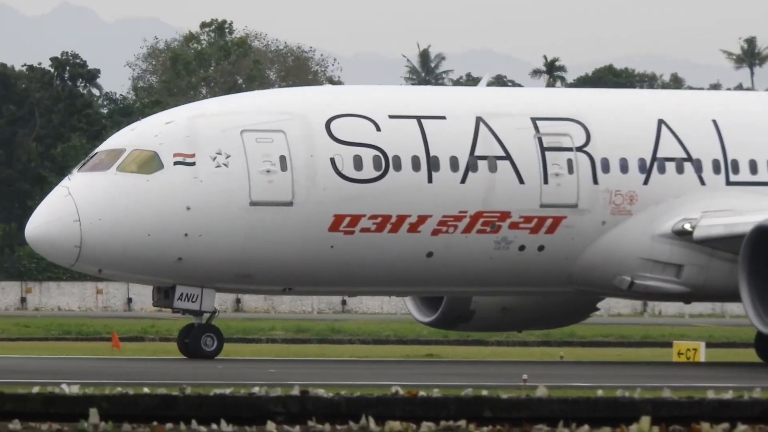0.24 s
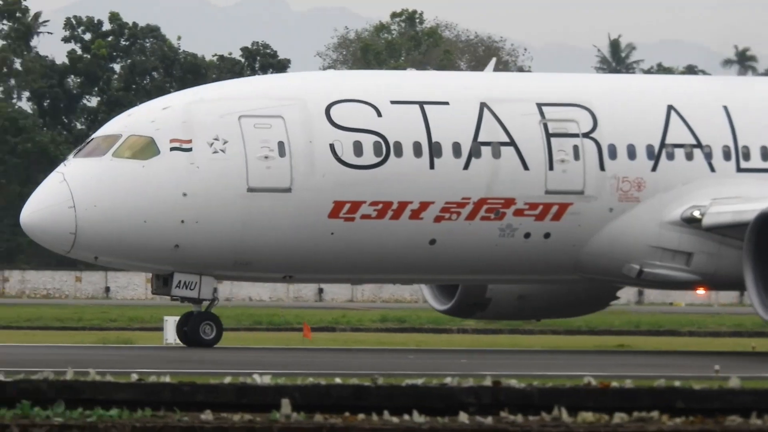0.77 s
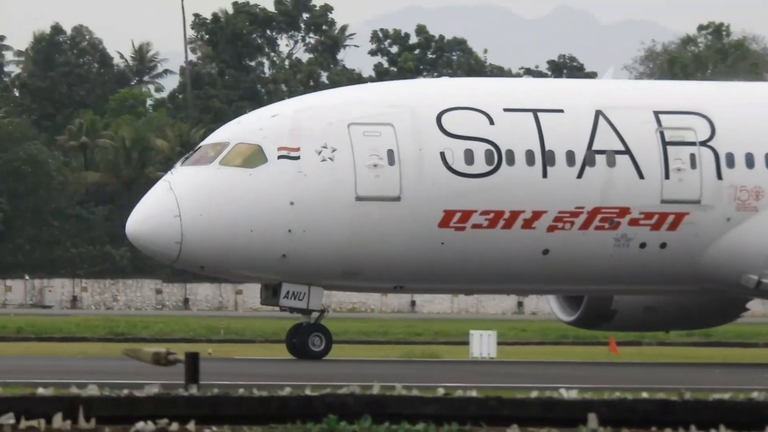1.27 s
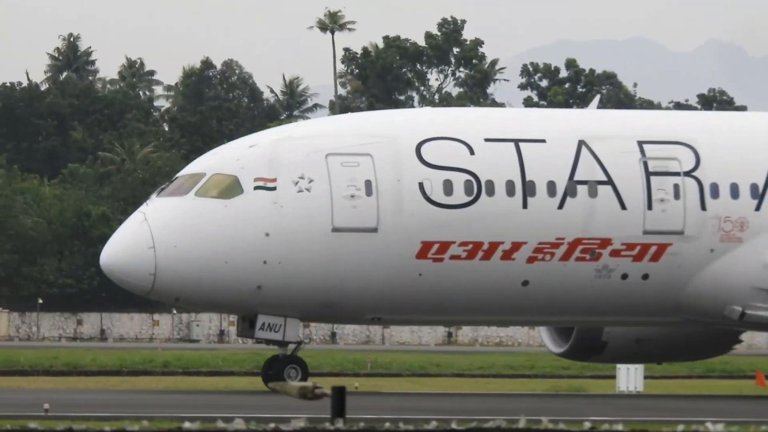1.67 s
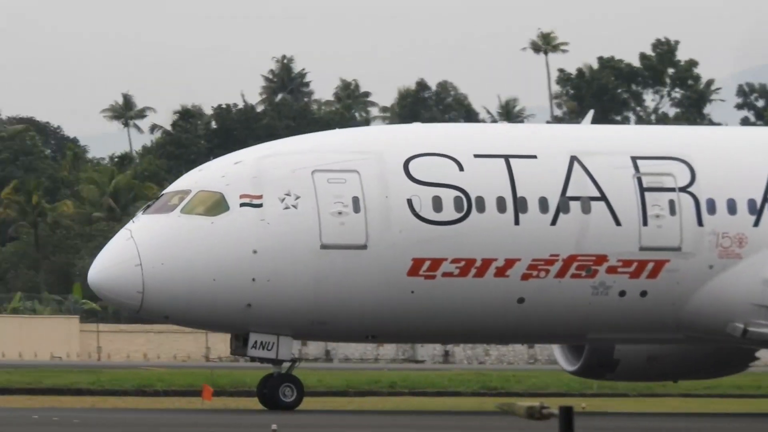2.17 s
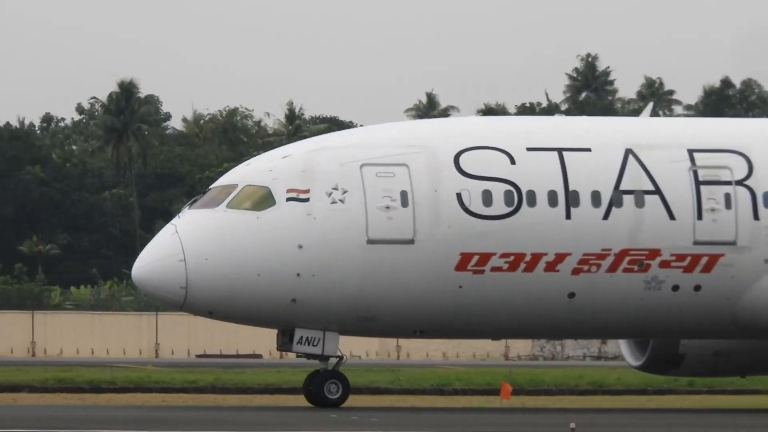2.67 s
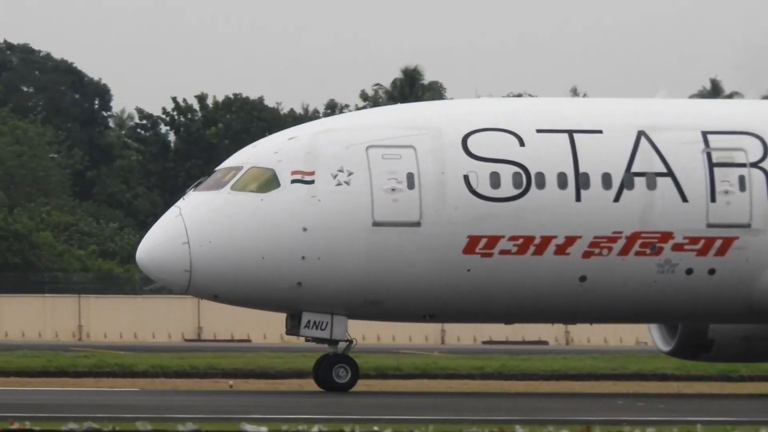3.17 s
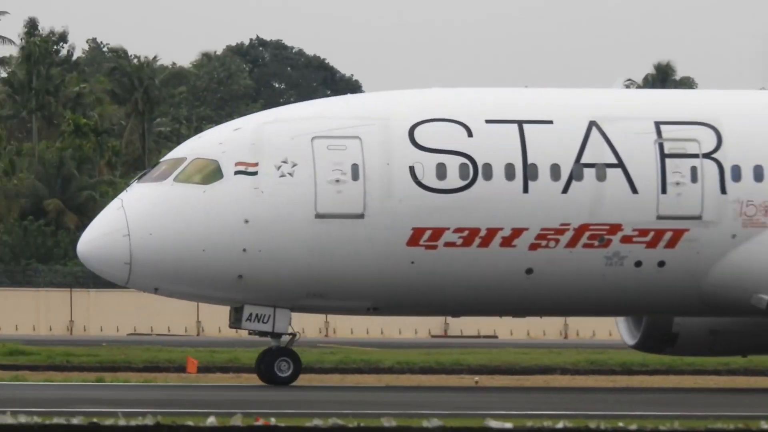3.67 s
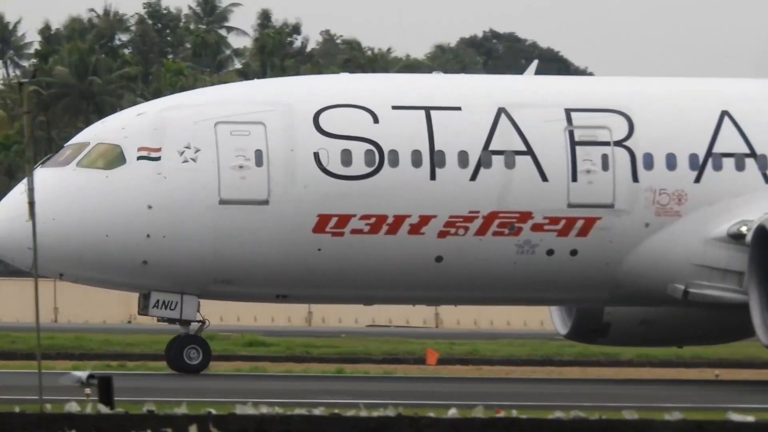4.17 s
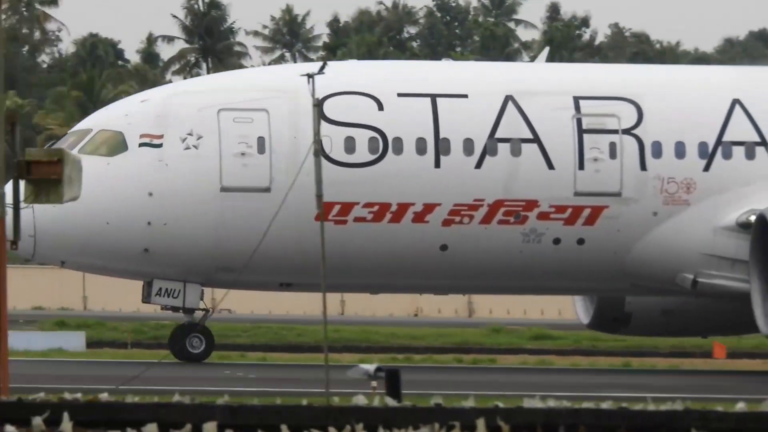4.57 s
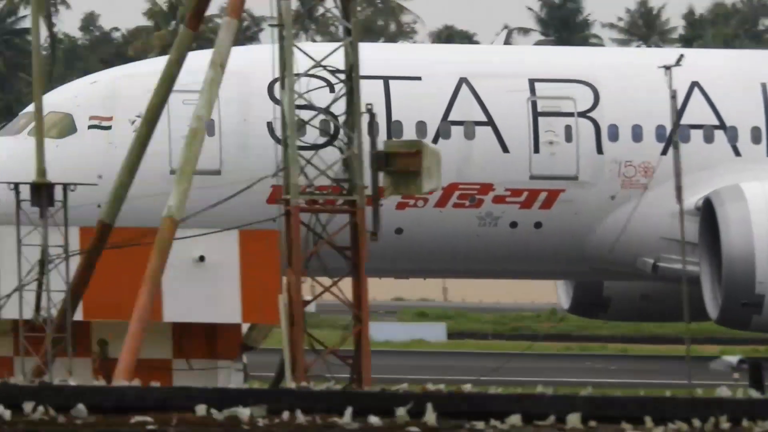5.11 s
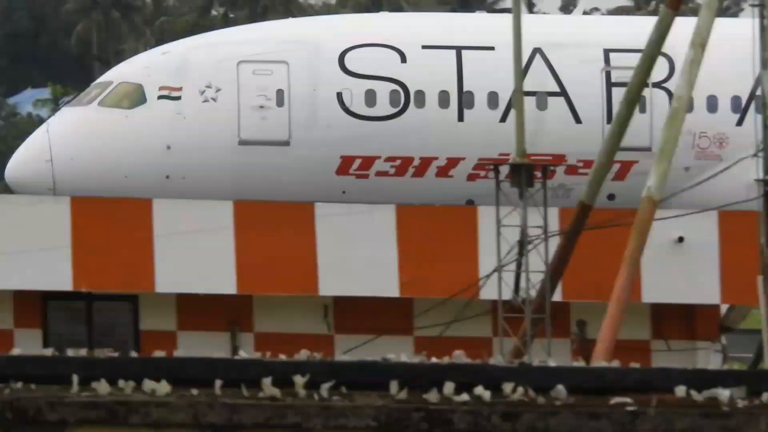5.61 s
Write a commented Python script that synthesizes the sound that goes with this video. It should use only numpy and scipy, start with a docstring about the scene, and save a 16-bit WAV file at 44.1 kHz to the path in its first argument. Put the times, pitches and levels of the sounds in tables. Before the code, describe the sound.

Low jet rumble and bright gusty hiss from a passing airliner; thin falling whistles early, then a rising fan whine and hollow howl.

```python
"""Distant airliner taxiing and spooling up

A twin-engine airliner taxis past at a distance, heard outdoors on a camera's two microphones.
Filtered noise makes the exhaust rumble, the rushing air and the intake hiss; thin whistles slide down.
Sine overtones of the blade rate climb as the two fans spool up, and swell as their beam sweeps past.
Gusts lift the treble and random motion makes it flutter; the left channel is dull and slightly late."""
import sys
import numpy as np
from scipy import signal
from scipy.fft import rfft, irfft, next_fast_len
from scipy.io import wavfile
from scipy.ndimage import map_coordinates

SR = 44100
rng = np.random.default_rng(int(sys.argv[2]) if len(sys.argv) > 2 else 0)


def materialize(psi):
    """Save the field psi as 16-bit PCM at rate SR to the path in sys.argv[1].

    A 1-D psi becomes a single channel; in a 2-D psi each row is a channel.
    """
    bounded = np.clip(np.atleast_2d(psi).T, -1, 1)
    quanta = np.round(bounded * 32767).astype(np.int16)
    wavfile.write(sys.argv[1], SR, quanta)


N = 257984
TIME = np.arange(N) / SR  # s

# Fan speed as the rate of passing blades: [t/s, f/Hz]
FAN_SPEED = [(0, 410), (1, 465), (1.5, 518), (1.75, 547), (2, 567), (2.25, 584), (2.5, 597), (3, 617),
             (3.5, 635), (4, 645), (5, 654), (5.85, 657)]


def amp(db):
    """Decibels to gain."""
    return 10 ** (np.asarray(db) / 20)


def curves(table):
    """Each column of a table after the first, drawn as a line through time."""
    s, *columns = np.transpose(table)
    return [np.interp(TIME, s, column) for column in columns]


def bell(s, spread_s):
    """A smooth Gaussian rise and fall that peaks at 1."""
    return np.exp(-0.5 * ((TIME - s) / spread_s) ** 2)


def shape(x, colour, lag=None):
    """Filter by points of [f/Hz, level/dB], with an optional delay by points of [f/Hz, delay/s]."""
    size = next_fast_len(N, True)
    f = np.arange(size // 2 + 1) * SR / size
    hz, db = np.transpose(colour)
    gain = amp(np.interp(np.log(f + 1), np.log(hz), db))
    if lag is not None:
        delay_s = np.interp(f, *np.transpose(lag))
        gain = gain * np.exp(-2j * np.pi * f * delay_s)
    return irfft(rfft(x, size) * gain, size)[:N]


def noise(colour):
    """Two unrelated noises of one colour, together of rms 1: the direct and the scattered sound."""
    x = np.array([shape(rng.standard_normal(N), colour) for _ in range(2)])
    return x / x.std()


def walk(rate):
    """Smooth random motion with a spread near 1, through `rate` random points per second."""
    points = rng.standard_normal(4096)
    coarse_s = TIME[::32]
    motion = map_coordinates(points, [coarse_s * rate], order=3, mode="wrap")
    return np.interp(TIME, coarse_s, motion)


def tone(phase, haze, haze_rate):
    """Direct and scattered tone of rms near 1; turbulence spreads a part into a narrow skirt of noise."""
    in_phase = (1 + haze * walk(haze_rate)) * np.sin(phase)
    quadrature = haze * walk(haze_rate) * np.cos(phase)
    direct = (in_phase + quadrature) / np.sqrt(1 + 2 * haze ** 2)
    scattered = np.sin(phase + 2 * walk(18))
    return np.sqrt(2) * np.array([direct, scattered])


def exhaust(boom_db=4, boom_fade_db_per_s=0.5):
    """Jets of hot gas rumble, boom and roar as shaped noise; a wavering drone swells among them."""
    # Exhaust before trim: [t/s, deep rumble level/dB, jet roar level/dB]
    exhaust_levels = [(0, -31.5, -34.5), (.4, -38, -34.5), (.75, -34.5, -33), (.95, -35, -34.5),
                      (1.22, -27.5, -32.5), (1.6, -27, -30), (2.0, -28.5, -36.5), (2.9, -33.5, -36),
                      (3.4, -31, -38.5), (3.95, -30.5, -33.5), (4.55, -30, -30), (5.45, -26, -30),
                      (5.85, -31.5, -30.5)]
    # Drone that swells as the engines spool up, before trim: [t/s, f/Hz, level/dB]
    drone_course = [(0, 100.5, -43), (.68, 102.2, -27), (.92, 101.9, -41), (1.05, 97.7, -18),
                    (1.5, 96.48, -24.5), (1.85, 91.5, -22), (2.1, 89, -29), (2.6, 95.24, -30),
                    (3.1, 93.3, -32), (3.6, 95.8, -46)]
    # Relative spectra of the three noises: [f/Hz, level/dB]
    rumble_colour = [(12, -13), (22, -25), (37, -41), (52, -14), (64, 5.5), (78, 7), (95, -3), (130, -12),
                     (300, -58)]
    boom_colour = [(60, -39), (78, -8), (88, -3), (97, 0), (110, -5), (128, -1.5), (160, -11.5), (200, -18),
                   (300, -52)]
    roar_colour = [(100, -1), (150, 3.5), (195, 1.5), (230, -5.5), (280, -11.5), (380, -13.5), (500, -14),
                   (800, -37)]

    rumble_db, roar_db = curves(exhaust_levels)
    drone_hz, drone_db = curves(drone_course)
    rumble = noise(rumble_colour) * amp(rumble_db - 1.0)
    # the boom follows rumble and roar, and slowly recedes against them
    boom_level_db = (rumble_db + roar_db) / 2 + boom_db - boom_fade_db_per_s * TIME
    boom = noise(boom_colour) * amp(boom_level_db)
    roar = noise(roar_colour) * amp(roar_db + 1.5)
    drone_phase = 2 * np.pi * np.cumsum(drone_hz) / SR
    drone = tone(drone_phase, haze=0.66, haze_rate=20) * amp(drone_db - 2.6)
    return rumble + boom + roar + drone


def airflow(howl_s=5.15, howl_spread_s=0.56, howl_rise_db=8):
    """Air rushes through the engines as banded noise; a hollow howl swells as they draw level."""
    # Rushing air before trim: [t/s, rush level/dB, upper rush level/dB]
    rush_levels = [(0, -47, -43), (.3, -46.5, -44), (.55, -42.5, -39), (.82, -39.5, -37.5),
                   (1.02, -42, -39.5), (1.35, -41.5, -34), (1.78, -42, -36), (1.95, -47, -42),
                   (2.8, -47.5, -40), (3.8, -48.5, -43.5), (4.3, -46, -40.5), (5.1, -40.5, -37.5),
                   (5.85, -45, -40.5)]
    # Relative spectra, the howl's around the blade rate: [f/Hz, level/dB]
    howl_colour = [(380, -31), (500, -5.5), (570, -1), (650, 1), (730, -0.5), (820, -15.5), (1100, -33)]
    rush_colour = [(200, -30), (350, -9), (480, -12.5), (850, 1.5), (1100, 5), (1400, -2.5), (1700, 4),
                   (1950, 1.5), (2400, 7.5), (3500, -27)]
    upper_rush_colour = [(1600, -20), (2000, 1), (2400, 3.5), (2800, 3.5), (3250, -1.5), (3700, -20),
                         (4500, -64.5)]

    rush_db, upper_db = curves(rush_levels)
    howl_db = -40.5 + howl_rise_db * bell(howl_s, howl_spread_s)
    howl = noise(howl_colour) * amp(howl_db + 0.66 * walk(22))
    rush = noise(rush_colour) * amp(rush_db + 8.5 + 1.4 * walk(14))
    upper = noise(upper_rush_colour) * amp(upper_db + 6 + 1.5 * walk(21.99))
    return howl + rush + upper


def gusts():
    """Moving air carries the treble over: the lift in dB of its lower and its upper part."""
    # Gusts: [t/s of the peak, spread/s, lower hiss lift/dB, upper hiss lift/dB]
    gust_events = [(2.34, 0.05, 4.5, 3.5), (2.758, 0.039, 6, 2), (2.92, 0.094, 1.5, 4.5),
                   (3.054, .03, 2.5, 4.5), (3.15, 0.017, 3.5, 7), (3.415, 0.048, 1.5, 4),
                   (3.603, 0.028, 2, 8), (4.225, 0.026, .5, 5.5), (4.63, 0.035, 0, 3.5),
                   (4.798, 0.039, 1, 5), (5.662, 0.054, 4.5, 6)]
    return sum(np.outer([low_db, high_db], bell(s, spread_s))
               for s, spread_s, low_db, high_db in gust_events)


def ribbed(x, centre_hz=3874, spacing_hz=104, spread_hz=220, depth_db=2.6):
    """Evenly spaced peaks and dips rib the lower edge of the hiss."""
    offset = np.arange(-800, 800, 8)  # Hz
    ripple = np.cos(2 * np.pi * offset / spacing_hz)
    db = depth_db * ripple * np.exp(-0.5 * (offset / spread_hz) ** 2)
    return shape(x, np.column_stack([centre_hz + offset, db]))


def intakes(brighten_db_per_hz=0.0115):
    """Two broad humps of hiss, the upper rising with fan speed; gusts lift them and eddies flutter them."""
    # Intake hiss between gusts, before trim: [t/s, level/dB]
    hiss_levels = [(0, -29), (.35, -27.5), (.45, -24), (.7, -22.5), (.95, -25), (1.25, -21.5),
                   (1.83, -20.5), (2.04, -26.5), (2.95, -27), (3.3, -29.5), (3.9, -33), (4.3, -28.5),
                   (5.3, -26), (5.85, -30)]
    # Relative spectra of the two humps: [f/Hz, level/dB]
    low_hiss_colour = [(2700, -28.5), (3300, -13.5), (3750, -8.5), (4300, 0.5), (4750, 2), (5350, 0.5),
                       (6000, -4.5), (7000, -61), (8500, -62)]
    high_hiss_colour = [(5200, -33), (6200, -7.5), (6700, -4), (7300, 2), (7900, 2), (8500, -5),
                        (9200, -12), (9800, -23), (10250, -24), (10450, -28), (11200, -44)]

    hiss_db, = curves(hiss_levels)
    blade_hz, = curves(FAN_SPEED)
    low_gust_db, high_gust_db = gusts()
    bright_db = brighten_db_per_hz * (blade_hz - blade_hz[0])
    low_db = hiss_db + low_gust_db + 4.5 + 0.77 * walk(35)
    high_db = hiss_db + high_gust_db + bright_db + 5.0 + 0.9 * walk(40)
    low = noise(low_hiss_colour) * amp(low_db)
    high = noise(high_hiss_colour) * amp(high_db)
    return np.array([ribbed(x) for x in low]) + high


def whistles(centre_hz=9740, fall_hz_per_s=1050, half_length_s=0.1):
    """Thin tones slide down through a narrow band of sizzle and die out as the fans speed up."""
    # Whistles: [t/s of the loudest point, level/dB]
    whistle_events = [(-.06, -18.5), (0.202, -23.5), (.5, -22.5), (.74, -23), (.96, -25), (1.15, -26.5),
                      (1.321, -29.5), (1.499, -30)]
    # Sizzle around them: [t/s, level/dB]
    sizzle_levels = [(0, -29.5), (.6, -26.5), (1.2, -29), (1.6, -30.5), (2.1, -36), (2.6, -45)]
    # Relative spectrum of the sizzle: [f/Hz, level/dB]
    sizzle_colour = [(8700, -17), (9300, -1), (9550, 4.5), (9800, 2.5), (10050, -1.5), (10300, -12),
                     (10800, -39)]

    sizzle_db, = curves(sizzle_levels)
    out = noise(sizzle_colour) * amp(sizzle_db)
    for s, db in whistle_events:
        age = TIME - s
        phase = 2 * np.pi * np.cumsum(centre_hz - fall_hz_per_s * age) / SR
        # half amplitude at half_length_s either side of the peak
        swell = 1 / (1 + (age / half_length_s) ** 2) * (np.abs(age) < 0.5)
        out = out + tone(phase, haze=0.96, haze_rate=50) * amp(db) * swell
    return out


def breeze():
    """A light breeze buffets the microphones: soft low noise, different at each port."""
    # Relative spectrum of the buffeting: [f/Hz, level/dB]
    breeze_colour = [(15, -14), (28, -2), (40, 5), (55, -4), (120, -38.5)]
    # Buffeting: [t/s, level/dB]
    breeze_levels = [(0, -35), (1.85, -43), (2.2, -52), (5.85, -49)]
    breeze_db, = curves(breeze_levels)
    return noise(breeze_colour) * amp(breeze_db)


def fan_note(phase):
    """The lowest tones of the two fans merge into one that fades in and out over a faint steady part."""
    # Swells before trim: [t/s of the peak, half-length/s, level/dB]
    swell_events = [(1.66, 0.14, -41.5), (2.268, 0.14, -32.5), (2.625, .04, -33), (2.794, 0.024, -35.5),
                    (2.99, 0.044, -35), (3.326, 0.24, -33.5), (3.65, 0.028, -36.5), (4.467, 0.18, -35.5),
                    (5.05, 0.25, -36.5), (5.695, .05, -40)]
    swell = sum(amp(db) / (1 + ((TIME - s) / half_length_s) ** 8)
                for s, half_length_s, db in swell_events)
    steady = amp(-46) * np.interp(TIME, [1.4, 2.5], [0, 1])
    return tone(phase, haze=0.26, haze_rate=35) * np.hypot(swell, steady) * amp(0.5)


def fans(fade_db=2.5, near_db=-2.0, far_db=-3.0, gust_share=1.0):
    """Two fans at slightly different speeds; overtones of the blade rate beam forward and sideways."""
    # Overtones before trim: [multiple of blade rate, forward beam level/dB, side level/dB]
    overtones = [(2, -36.5, -60), (3, -39.5, -61), (4, -39, -49), (5, -39.5, -62), (6, -44, -40),
                 (7, -47, -32), (8, -39, -32.5), (9, -29, -48), (10, -44, -36), (11, -36, -30.5),
                 (12, -31.5, -33.5), (13, -25.5, -45), (14, -34, -56)]
    # Brief glints of single overtones before gusts: [multiple of blade rate, t/s of the peak, level/dB]
    glints = [(8, 1.795, -20), (9, 1.8, -24), (7, 1.98, -35), (13, 2.273, -28), (9, 2.327, -29),
              (8, 2.77, -34), (9, 2.733, -31.5), (11, 3.08, -27), (12, 3.14, -20), (12, 3.3, -26)]
    # Start and end of the side of the fans coming into view: [t/s]
    side_view_s = [1.5, 4.2]
    beam_narrowing = 0.33  # higher overtones beam more narrowly, by this power of their multiple

    blade_hz, = curves(FAN_SPEED)
    near_hz = blade_hz * (1 + 0.000674 * walk(15))
    far_hz = blade_hz * (1 - 0.009 + 0.001111 * walk(14))
    near = 2 * np.pi * np.cumsum(near_hz) / SR
    far = 2 * np.pi * np.cumsum(far_hz) / SR
    out = fan_note((near + far) / 2)
    beam = bell(2.5, spread_s=0.34)  # sweep of the forward beam for the 8th overtone
    side = np.interp(TIME, side_view_s, [0, 1])
    gust_db = gust_share * gusts().mean(axis=0)
    for multiple, beam_db, side_db in overtones:
        k = round(multiple)
        height = k / 8
        # the low overtones come mostly from the far fan, around the fuselage, broken into a band of noise
        clean = tone(k * near, haze=0.7, haze_rate=45) * amp(near_db) * min(height, 1)
        hoarse = tone(k * far, haze=4, haze_rate=130) * amp(far_db)
        # each overtone fades on its own, the low ones most deeply; gusts lift the high ones most
        fading_db = fade_db * walk(18) / np.sqrt(height)
        flutter = amp(fading_db + gust_db * height - 0.6)
        forward = amp(beam_db) * beam ** (height ** (2 * beam_narrowing))
        sideways = amp(side_db) * side
        out = out + (clean + hoarse) * flutter * (forward + sideways)
    for multiple, s, db in glints:
        glint = tone(round(multiple) * near, haze=0.87, haze_rate=60)
        out = out + glint * amp(db + gust_db) * bell(s, spread_s=0.095)
    return out


def scene():
    """The right channel hears the aircraft fully; the left is shaded, later and mixed with scattered sound."""
    # Sound scattered from the surroundings against the direct sound: [f/Hz, level/dB]
    scatter = [(25, 12), (60, -31), (120, -16.5), (350, 4), (620, -12), (900, 3), (1400, -5), (2000, -7.5),
               (2500, 3), (3100, 2.5), (4500, 2), (6000, -4), (8000, 5), (9700, -2)]
    # Left channel against the right: [f/Hz, level/dB]
    left_shade = [(100, 2), (350, 2.5), (650, 1.5), (1300, 1), (1950, 0), (2500, -11), (3300, -8),
                  (4200, -14.5), (5500, -20.5), (6400, -19.5), (7600, -42.5), (8800, -32), (9700, -29)]
    # Delay of the left channel, where sound bends round the camera body: [f/Hz, delay/s]
    left_lag = [(600, 0.00021), (1500, 0.00016), (2000, 0.00021), (3100, 0.00012), (3800, 0.00016),
                (7000, 0.00019)]

    direct, scattered = exhaust() + airflow() + intakes() + whistles() + fans()
    # the two shares add up to the full power at each frequency
    direct_share = [(hz, -10 * np.log10(1 + amp(db) ** 2)) for hz, db in scatter]
    scattered_share = [(hz, -10 * np.log10(1 + amp(-db) ** 2)) for hz, db in scatter]
    mixed = shape(direct, direct_share) + shape(scattered, scattered_share)
    left = shape(mixed, left_shade, lag=left_lag)
    return np.array([left, direct]) + breeze()


def record(dry, ceiling=0.92, top_hz=11100):
    """The camera rounds the very highest peaks and cuts the top steeply."""
    rounded = dry / (1 + (dry / ceiling) ** 8) ** (1 / 8)
    # order 10, 0.2 dB of ripple below top_hz, 70 dB of rejection above
    top_cut = signal.ellip(10, 0.2, 70, top_hz, fs=SR, output="sos")
    return signal.sosfilt(top_cut, rounded)


dry = scene()
out = record(dry)
materialize(out)
```